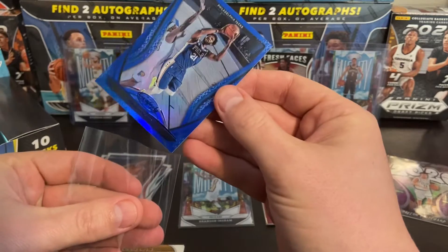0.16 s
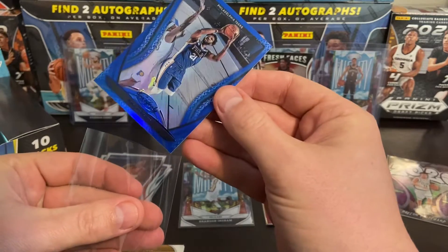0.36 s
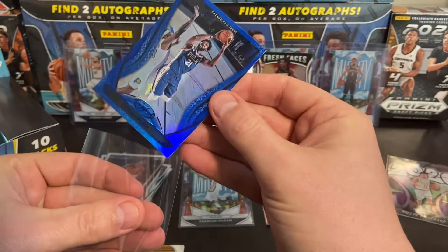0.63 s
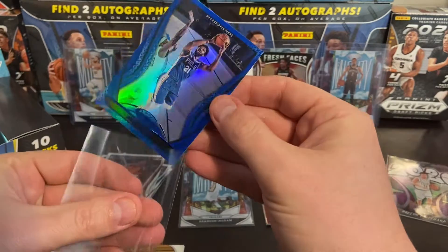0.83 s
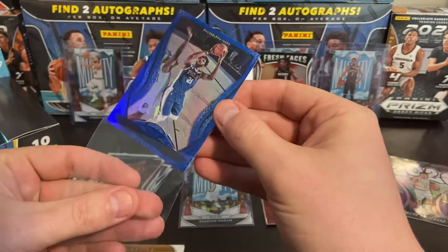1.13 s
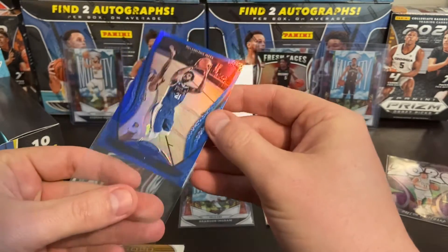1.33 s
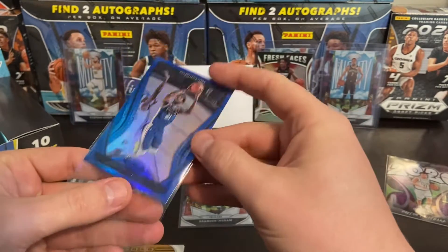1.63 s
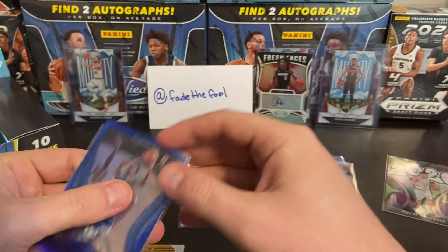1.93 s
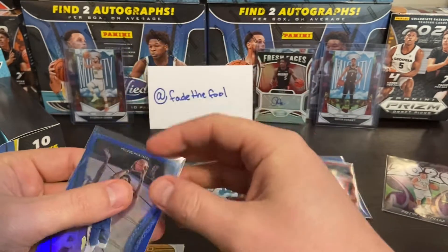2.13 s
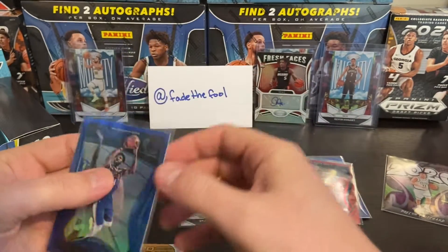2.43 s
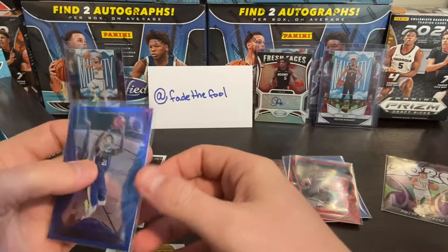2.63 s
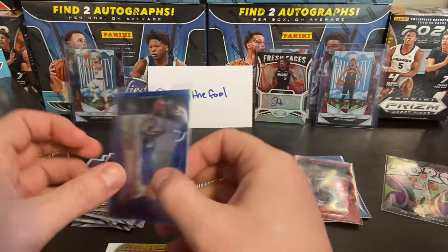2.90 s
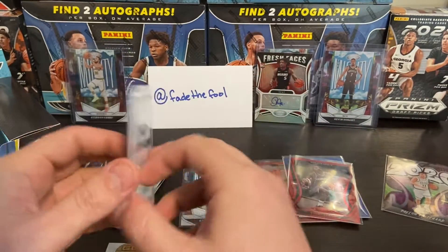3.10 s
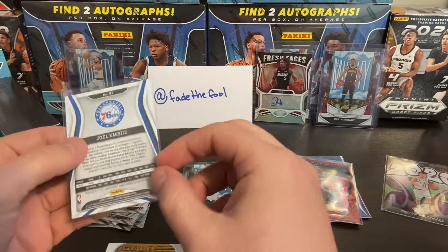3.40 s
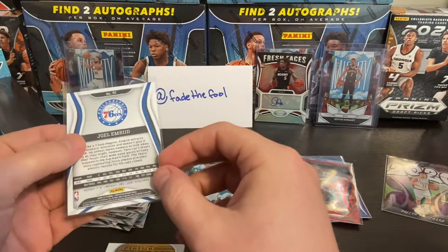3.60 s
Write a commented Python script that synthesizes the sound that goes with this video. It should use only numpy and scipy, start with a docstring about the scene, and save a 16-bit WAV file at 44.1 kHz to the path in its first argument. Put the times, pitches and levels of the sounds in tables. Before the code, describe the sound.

Plastic film rustles and snaps around a card, sparse at first, busiest just before one second, then in scattered crisp clicks and brushes with dull knocks, over a distant wavering drone indoors, recorded close on a phone.

```python
"""Hands work a card into a soft plastic sleeve on a table in a quiet room, a two-port phone close by.
First come a few crease snaps and faint squeaks over a distant engine drone; from 0.6 s the film rubs in strokes.
The drone shifts near 2 s, where a hard snap falls; two dull knocks come at 3 s and another hard snap at 3.2 s.
Rubs are hiss and slips ringing film facets, snaps are ticks in noise bursts, knocks and squeaks are sines.
The engines are wavering sines over low noise; the room is soft shaped noise."""
import sys
import numpy as np
from scipy import signal
from scipy.fft import rfft, irfft, next_fast_len
from scipy.io import wavfile
from scipy.ndimage import uniform_filter1d

SR = 44100
rng = np.random.default_rng(int(sys.argv[2]) if len(sys.argv) > 2 else 0)


def nominal_scale(level):
    """Amplitude ratio for a level in decibels (scalar or array-like)."""
    x = np.asarray(level, float) / 20
    return 10 ** x


def digitize_waveform(pressure):
    """Quantize a signal to 16-bit integers and store it at the path in sys.argv[1].

    Rows of a 2-D input are taken as channels; values are limited to [-1, 1].
    """
    field = np.atleast_2d(pressure).T
    bounded = np.clip(field, -1, 1)
    quanta = np.round(bounded * 32767).astype(np.int16)
    wavfile.write(sys.argv[1], SR, quanta)


N = 165375  # 3.75 s


def logf(table, f):
    """Read (f/Hz, value) rows on a log-frequency axis."""
    a = np.array(table, float)
    return np.interp(np.log(f + 1), np.log(a[:, 0] + 1), a[:, 1])


def shape(x, gain):
    """Filter by a gain given as a function of Hz."""
    n = next_fast_len(N + 4096)
    f = np.arange(n // 2 + 1) * SR / n
    return irfft(rfft(x, n) * gain(f), n)[..., :N]


def unit(x):
    """Scale to rms 1."""
    return x / np.sqrt(np.mean(x ** 2))


def walk(rate):
    """Random levels of spread about 1, held 1 / rate s and slewed twice."""
    k = int(SR / rate)
    levels = rng.standard_normal(N // 20)[:N // k + 1]
    held = np.repeat(levels, k)
    return 1.3 * uniform_filter1d(uniform_filter1d(held, k), k)[:N]


def decay(t, t60):
    """Exponential fall by 60 dB in t60 seconds."""
    return np.exp(-np.log(1000) * t / t60)


def curve(rows, col, t):
    """Read one column of a table over time."""
    a = np.array(rows, float)
    return np.interp(t, a[:, 0], a[:, col])


def presence(rows, t):
    """1 within the rows' time span and 0 outside, with 10 ms ramps; already on if it starts at 0."""
    first, last = rows[0][0], rows[-1][0]
    return np.clip(np.minimum(t - first, last - t) / 0.01 + (first < 0.02), 0, 1)


# resonances of small panels of film that the slips ring: f/Hz
FACET_RESONANCES = [1080, 2050, 3250, 4700, 6000, 7200, 11000, 12600]


def rub():
    """Friction hiss with crackling creases, plus tiny slips and hiss that ring the bending facets."""
    grains_per_s, grain_spread_db, grain_cap, grain_db = 500, 6, 3, 4
    hiss_db, facet_q = -3, 10.3
    flex_db, flex_per_s = 3, 22  # each facet's loudness shifts as the film bends
    crackle_per_s, crackle_s, crackle_db = 130, 0.0015, 0  # tiny creases: rate, decay time, strength
    patchy_db, patchy_per_s = 2, 120
    chance, size, sign, facet = rng.random((4, N))
    grain_level = nominal_scale(grain_spread_db * np.minimum(-np.log(1 - size), grain_cap))
    grains = (chance < grains_per_s / SR) * grain_level * np.sign(sign - 0.5)
    pick = (facet * len(FACET_RESONANCES)).astype(int)
    rings = np.zeros(N)
    for k, hz in enumerate(FACET_RESONANCES):
        push = grains * (pick == k) + nominal_scale(hiss_db) * rng.standard_normal(N)
        push = push * nominal_scale(flex_db * walk(flex_per_s))
        rings += signal.lfilter(*signal.iirpeak(hz, facet_q, fs=SR), push)
    creases = grains ** 2 * (chance < crackle_per_s / SR)
    crackle = signal.lfilter([1], [1, -np.exp(-1 / (crackle_s * SR))], creases)
    hiss = rng.standard_normal(N) * np.sqrt(1 + nominal_scale(crackle_db) * crackle)
    return (hiss + nominal_scale(grain_db) * unit(rings)) * nominal_scale(patchy_db * walk(patchy_per_s))


# strokes of film on card and fingers, levels as drive ahead of the film's colour:
# (t/s, rise/s, fall/s, middle band level/dB, low band level/dB, top band level/dB)
FILM_STROKES = [(0, 0.00074, 0.046, -76, -74.5, -116), (0.582, 0.039, 0.064, -59.5, -60, -62),
                (0.658, 0.042, 0.036, -65.5, -59, -69.5), (0.744, 0.0027, 0.072, -61, -59, -59.5),
                (0.778, 0.059, 0.043, -56, -52, -50.5), (0.868, 0.065, 0.022, -51, -54, -47.5),
                (0.946, 0.0032, 0.16, -78, -66, -79), (1.035, 0.012, 0.027, -79.5, -112, -69.5),
                (1.12, 0.009, 0.044, -67.5, -64, -75.5), (1.202, 0.079, 0.047, -81, -83, -70.5),
                (1.377, 0.025, 0.091, -76, -75, -71.5), (1.626, 0.045, 0.046, -74.5, -74.5, -57),
                (1.832, 0.022, 0.17, -79, -70, -56.5), (1.971, 0.002, 0.1, -66.5, -69, -107),
                (2.061, 0.0059, 0.043, -68.5, -70.5, -57.5), (2.141, .015, 0.013, -65.5, -129, -58.5),
                (2.215, 0.012, 0.027, -59, -77, -61), (2.309, 0.019, 0.0056, -66.5, -124, -63),
                (0.9, 0.6, 2.1, -91, -89.5, -79.5), (2.701, 0.05, 0.056, -78.5, -75, -69.5),
                (2.918, 0.0097, 0.17, -77, -67.5, -114), (3.049, 0.026, 0.013, -55.5, -63, -51.5),
                (3.149, 0.0055, 0.11, -74, -78, -70.5), (3.225, 0.0058, 0.14, -78.5, -98, -71),
                (3.323, 0.019, 0.051, -76.5, -84.5, -63.5), (3.535, 0.017, 0.025, -87, -79.5, -101)]


def strokes(t):
    """Close film strokes: each swells and falls in straight ramps and rustles on; one drive per band."""
    linger_s, linger_db = 0.034, -18
    level = np.zeros((3, N))
    for s, rise, fall, mid_db, low_db, top_db in FILM_STROKES:
        swell = np.clip(np.minimum((t - s) / rise, (s + rise + fall - t) / fall), 0, 1)
        level += nominal_scale(np.array([[low_db], [mid_db], [top_db]])) * swell
    a = np.exp(-1 / (linger_s * SR))
    level = level + nominal_scale(linger_db) * signal.lfilter([1 - a], [1, -a], level)
    film_rub = rub()
    flutter_db = np.array([1.5 * walk(40) for _ in range(3)])
    return level * film_rub * nominal_scale(flutter_db)


# creases snapping, t midway up the burst's rise, tick levels as drive ahead of filtering:
# (t/s, top band tick level/dB, low band level/dB re top, middle band level/dB re top)
CREASE_SNAPS = [(0.192, -42.5, -11, -8), (0.3527, -30, -7.5, 0), (0.362, -46.5, -2, 0.5),
                (0.6421, -32.5, 5.5, 0), (0.7332, -54, 22.5, 23.5), (0.7473, -26.5, -4, -22),
                (1.1342, -35, -29, -8), (1.158, -44.5, -5, 3), (1.205, -46, -12, -1),
                (1.2546, -44, -22, -10), (1.293, -36.5, -25, -18), (1.3804, -58, 15, -4),
                (1.4597, -41, -30, -6), (1.6128, -33, -4.5, -1.5), (1.8315, -20.5, -4.5, -10),
                (1.9711, -11.5, -13, -15.5), (2.0699, -45, 1, 10), (2.2319, -25, -61, 4.5),
                (2.4306, -45.5, -7, -23), (2.6091, -30.5, -17.5, -36), (2.6402, -38.5, -32, -22),
                (2.7029, -60, 17.5, 16.5), (2.7714, -36, -30, -26), (3.0035, -32.5, 12, 11),
                (3.153, -22, -45, -25), (3.162, -35, -14, 0.5), (3.2306, -22, -43, -14.5),
                (3.238, -13, -29, -21), (3.559, -45.5, -7, -11)]


def snaps():
    """Creases give way: a quick burst of crackle around one tick, and a faint tail; one drive per band."""
    tick_db = 15  # tick over burst
    rise_s, burst_t60_s = 0.0022, 0.009
    tail_db, tail_t60_s = -17.5, 0.16  # tail level is re burst
    low_cut_hz = 702
    n = SR // 8  # each snap is cut off after 1/8 s
    t = np.arange(n) / SR
    k = int(rise_s * SR)
    burst = np.minimum(t / rise_s, decay(t - rise_s, burst_t60_s))
    tail = nominal_scale(tail_db) * decay(t, tail_t60_s)
    out = np.zeros((3, N + SR))
    for s, db, low_db, mid_db in CREASE_SNAPS:
        z = rng.standard_normal((3, n))
        x = (z[0] * np.abs(z[2]) * burst + z[1] * tail) / nominal_scale(tick_db)
        x[k] += 1  # the tick
        i = int(s * SR) - k // 2
        out[:, i:i + n] += nominal_scale(db + np.array([[low_db], [mid_db], [0]])) * x
    return signal.lfilter(*signal.butter(2, low_cut_hz, "high", fs=SR), out[:, :N])


# lower edges of the film's low, middle and top bands: f/Hz
BAND_EDGES = [220, 1500, 7000]


def band(k, f):
    """Gain of one of three overlapping bands of the film's sound, at unit power."""
    above = [1 / (1 + (e / (f + 1)) ** 6) for e in BAND_EDGES] + [0]
    return unit(np.sqrt(np.maximum(above[k] - above[k + 1], 0)))


# colour of the film: (f/Hz, level/dB)
FILM_COLOUR = [(200, 5), (350, 2.5), (700, -7.5), (1100, -3), (2050, -6), (4700, -4), (7000, -6.5),
               (9200, 3.5), (13000, -10), (15700, -1.5)]


def film(t):
    """Strokes and snaps radiate through the same film: three bands under one colour, summed."""
    def gain(f):
        return np.array([band(k, f) for k in range(3)]) * nominal_scale(logf(FILM_COLOUR, f))
    return shape(strokes(t) + snaps(), gain).sum(0)


# card knocks the fingers: (t/s, f/Hz, starting envelope level/dB, t60/s)
CARD_KNOCKS = [(3.004, 215, -37, 0.042), (3.059, 331, -53, 0.092)]


def thumps(t):
    """Dull knocks: low sines that die away exponentially."""
    out = np.zeros(N)
    for s, hz, db, t60 in CARD_KNOCKS:
        d = np.maximum(t - s, 0)
        out += nominal_scale(db) * np.sin(2 * np.pi * hz * d) * decay(d, t60)
    return out


# faint thin squeaks: (t/s, length/s, start f/Hz, end f/Hz, peak level/dB, breathy width f/Hz)
THIN_SQUEAKS = [(0.308, 0.08, 3050, 3420, -82, 40), (0.45, 0.15, 4450, 4100, -84, 200),
                (0.46, 0.14, 3850, 3500, -86, 280)]


def squeaks(t):
    """Gliding sines whose pitch jitters fast enough to sound breathy."""
    out = np.zeros(N)
    for s, dur, a_hz, b_hz, db, width_hz in THIN_SQUEAKS:
        p = np.clip((t - s) / dur, 0, 1)
        hz = a_hz + (b_hz - a_hz) * p + width_hz * walk(900)
        out += nominal_scale(db) * np.sin(np.pi * p) ** 0.5 * np.sin(2 * np.pi * np.cumsum(hz) / SR)
    return out


# distant engines through the walls, f at half the upper tone, levels rms before the waver:
# (t/s, lower tone f/Hz, level/dB of the tone at 2f, level/dB of the tone at f)
ENGINE_EARLY = [(0, 51.57, -48.5, -50), (.35, 50.33, -48.5, -39.5), (.9, 48.8, -55.5, -47.5),
                (1.4, 45.4, -61, -57.5), (1.8, 46.7, -77, -47.5)]
ENGINE_LATE = [(1.95, 48.8, -56.5, -77), (2.25, 53.43, -51, -74), (2.55, 57.77, -62, -56.5),
               (3.1, 54.24, -52, -62.5), (3.75, 50.3, -57, -61)]
# a single tone: (t/s, f/Hz, level/dB)
ENGINE_BRIEF = [(.82, 83, -52), (.95, 79.5, -43.5), (1.25, 80.8, -53.5)]


def drones(t):
    """Engine tones: sines at f and 2f whose pitch and level waver as they follow the tables."""
    pitch_waver, level_waver_db = 0.01283, -1.5  # pitch as a fraction of f
    pair = ((2, 2), (1, 3))  # (multiple of f, level column)
    out = np.zeros(N)
    for rows, parts in ((ENGINE_EARLY, pair), (ENGINE_LATE, pair), (ENGINE_BRIEF, ((1, 2),))):
        fade = uniform_filter1d(presence(rows, t), size=3000)
        hz = curve(rows, 1, t) * (1 + pitch_waver * walk(10))
        turn = 2 * np.pi * np.cumsum(hz) / SR
        for m, col in parts:
            level = nominal_scale(curve(rows, col, t) + level_waver_db * walk(4.795))
            out += np.sqrt(2) * level * fade * np.sin(m * turn + 6 * rng.random())
    return out


# colour of the rumble: (f/Hz, relative level/dB)
RUMBLE_COLOUR = [(25, -36.5), (45, 10.5), (65, 1), (90, -2), (125, -8.5), (180, -33)]
# its rms over time: (t/s, level/dB)
RUMBLE_LEVEL = [(0, -48.5), (3.1, -51.5), (3.6, -52), (3.75, -74)]


def rumble(t):
    """Low rumble under the engines: noise shaped below 300 Hz, following a level curve."""
    noise = shape(rng.standard_normal(N), lambda f: nominal_scale(logf(RUMBLE_COLOUR, f)) * (f < 300))
    return nominal_scale(curve(RUMBLE_LEVEL, 1, t)) * unit(noise)


# colour of the room air: (f/Hz, relative level/dB)
ROOM_COLOUR = [(140, 0.5), (240, -12), (340, -10), (620, -25.5), (1100, -29), (5000, -34), (13000, -39.5),
               (16000, -62.5)]


def room_air():
    """Quiet room: shaped noise above 120 Hz whose level drifts slowly."""
    level_db = -73  # rms before the drift
    noise = shape(rng.standard_normal(N), lambda f: nominal_scale(logf(ROOM_COLOUR, f)) * (f > 120))
    return unit(noise) * nominal_scale(level_db + 1.5 * walk(2.5))


# scattered sound, differing between the microphone ports: (f/Hz, share as a gain)
SCATTER_SHARE = [(50, 0.064), (600, 0.73), (1400, 0.34), (8000, 0.15)]


def scattered(mid):
    """The sources through a short random echo; its strength and sign wander so the two sides differ."""
    echo = rng.standard_normal(4000) * np.exp(-np.arange(4000) / SR / 0.012)
    echo = echo / np.sqrt(np.sum(echo ** 2))
    wandering = signal.fftconvolve(mid, echo)[:N] * walk(30)
    return shape(wandering, lambda f: logf(SCATTER_SHARE, f))


def scene():
    """Film, small sounds, drones and room air, as two nearly equal paths."""
    t = np.arange(N) / SR
    mid = film(t) + room_air() + thumps(t) + squeaks(t) + rumble(t) + drones(t)
    side = scattered(mid)
    return np.array([mid + side, mid - side])


# phase between the two microphone ports: (f/Hz, left lead/rad)
PORT_LEAD = [(0, 0), (3000, -.3), (5600, -1.1), (6900, .3), (7400, 1.7), (8300, 2.9), (10000, 3.45),
             (11800, 6.2), (13400, 6.5), (14400, 9.2)]
# level between the ports: (f/Hz, left minus right level/dB)
PORT_BALANCE = [(60, 1.65), (700, -3), (9000, -0.66)]


def port(x, s):
    """One microphone port: half the phase and level difference, signed by s, and a cut at the top."""
    top_hz = 16300

    def gain(f):
        lead = np.interp(f, *np.array(PORT_LEAD).T)
        return (f < top_hz) * nominal_scale(s * logf(PORT_BALANCE, f) / 2) * np.exp(0.5j * s * lead)
    return shape(x, gain)


def low_pass(x):
    """Removes everything above the highest recorded frequency."""
    return signal.sosfilt(signal.butter(12, 16430, fs=SR, output="sos"), x)


def record(dry):
    """The phone's two ports, left and right, hear the scene with their own phase and level."""
    left, right = dry
    mix = np.array([port(left, 1), port(right, -1)])
    return low_pass(mix)


dry = scene()
out = record(dry)
digitize_waveform(out)
```